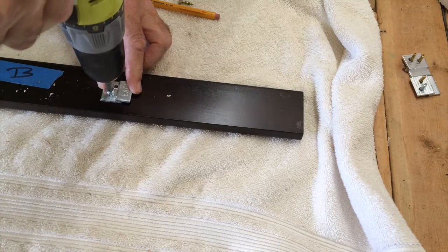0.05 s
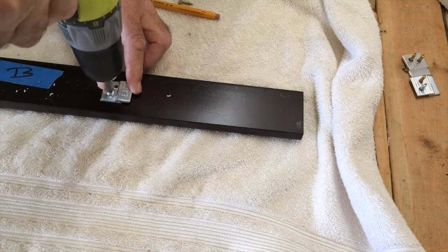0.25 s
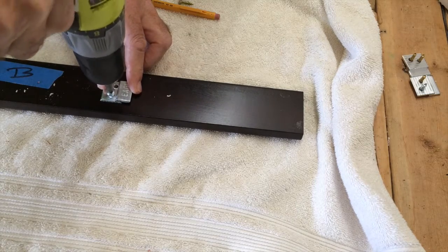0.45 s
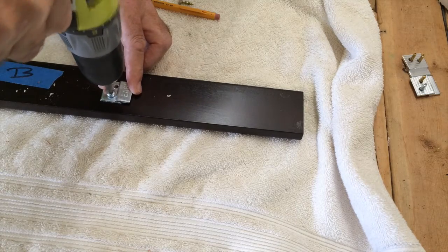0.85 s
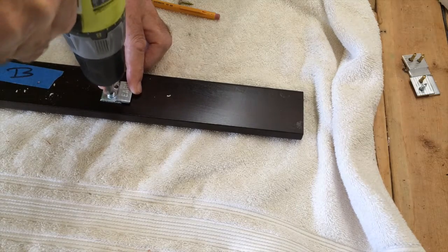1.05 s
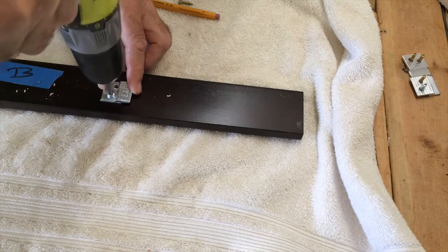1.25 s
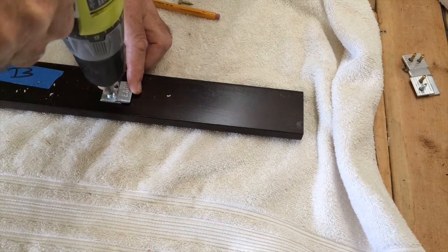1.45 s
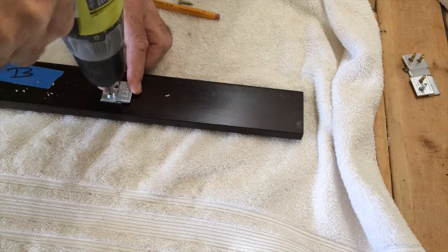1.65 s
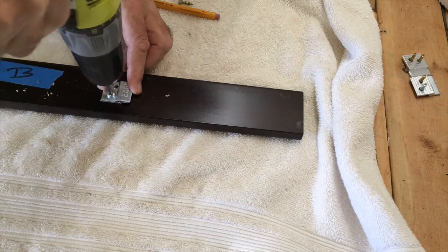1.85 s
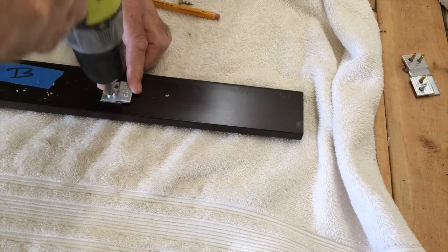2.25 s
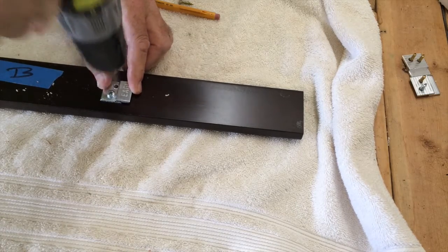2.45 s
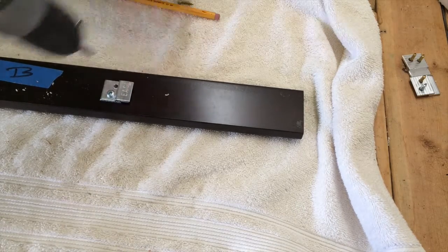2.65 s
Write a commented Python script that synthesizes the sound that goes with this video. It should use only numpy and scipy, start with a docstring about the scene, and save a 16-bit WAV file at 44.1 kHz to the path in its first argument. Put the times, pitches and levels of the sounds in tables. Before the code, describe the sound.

Close to the microphone in a small room, a cordless drill whines and whirrs in quick pulls, with soft board thuds and thin bit squeaks between them. Then it strains against the tight screw and its clutch slips with sharp clacks.

```python
"""A small room, one microphone close to a board that lies on a towel.
A cordless drill drives a screw through a metal hinge into the board. In each short pull the speed
control whines and the gears whirr; as it stops the board thuds and the steel bit squeaks.
Then the screw is tight and the clutch slips in hard clacks; one last pull, and the bit is lifted off."""
import sys
import numpy as np
from scipy import signal
from scipy.fft import rfft, irfft
from scipy.io import wavfile

SR = 44100
rng = np.random.default_rng(int(sys.argv[2]) if len(sys.argv) > 2 else 0)


def output_pcm(signal):
    """Save a mono or channel-first signal as 16-bit PCM at the path in sys.argv[1].

    Samples are clipped to [-1, 1] before scaling.
    """
    pcm = np.clip(np.atleast_2d(signal).T, -1, 1) * 32767
    wavfile.write(sys.argv[1], SR, np.round(pcm).astype(np.int16))


N = 119070
T = np.arange(N) / SR

# free-running trigger pulls: pressed t/s, released t/s, full-speed whine f/Hz, whine level/dB,
# gear level/dB, mesh level/dB relative to the gears
PULLS = [(-.15,-0.011,6300,-32,-28,-12), (0.196,0.366,6480,-38.5,-25.5,-7.5),
         (0.572,0.69,6306,-36,-24.5,-6), (0.91,1.026,6400,-40,-26.5,-11.5),
         (1.222,1.335,6376,-40.5,-29,-12.5)]
# spectrum of a light contact: f/Hz, level/dB
CONTACT_COLOUR = [(100,-3.5), (700,0), (1500,4), (2500,1.5), (4000,-2.5), (7000,-9), (15000,-24)]
SLACK_S, COAST_S = .012, .057  # the gears engage after the press and run on after the release


def amp(db):
    """Decibels to gain."""
    return 10 ** (np.asarray(db) / 20)


def unit(x):
    """Scale to rms 1."""
    return x / np.sqrt(np.mean(x ** 2) + 1e-20)


def drift(hz):
    """Random wander of rms 1, mostly slower than hz."""
    return unit(signal.sosfilt(signal.butter(2, hz, fs=SR, output="sos"), rng.standard_normal(N)))


def since(s):
    """Time gone by since s."""
    return np.maximum(T - s, 0)


def dying(t, t60):
    """Decay of 60 dB in t60."""
    return np.exp(-np.log(1000) * t / t60)


def gate(start, end, edge=.003):
    """On between two times, with soft edges."""
    return np.clip(np.minimum(T - start, end - T) / edge + .5, 0, 1)


def level(rows):
    """Gain along a curve of (t/s, level/dB), silent outside it."""
    s, db = np.transpose(rows)
    return amp(np.interp(T, s, db)) * gate(s[0], s[-1], edge=.004)


def colour(x, points, size=2048):
    """Minimum-phase filter through (f/Hz, level/dB) points; white noise keeps its level."""
    hz, db = np.transpose(points)
    bin_hz = np.arange(size + 1) * SR / size / 2
    gain = unit(amp(np.interp(np.log(bin_hz + 1), np.log(hz), db)))
    cepstrum = irfft(np.log(gain))
    cepstrum[1:size] *= 2
    cepstrum[size + 1:] = 0
    response = irfft(np.exp(rfft(cepstrum)))[:size]
    return signal.fftconvolve(x, response)[:N]


def clicks(rows):
    """One impulse per (t/s, level/dB)."""
    out = np.zeros(N)
    for s, db in rows:
        out[int(s * SR)] += amp(db)
    return out


def ring(x, modes):
    """Decaying sines, set off by x."""
    out = 0
    for hz, db, t60 in modes:
        r, w = amp(-60 / (t60 * SR)), 2 * np.pi * hz / SR
        out = out + amp(db) * signal.lfilter([0, np.sin(w)], [1, -2 * r * np.cos(w), r * r], x + 1e-18)
    return out


def cracks(rows, spectrum, t60):
    """Each contact is a brief, dying burst of noise."""
    envelope = signal.lfilter([1], [1, -dying(1 / SR, t60)], clicks(rows) + 1e-18)
    return colour(envelope * rng.standard_normal(N), spectrum)


def tone(hz):
    """Sine of rms 1 on a moving pitch."""
    return np.sqrt(2) * np.sin(2 * np.pi * np.cumsum(hz) / SR)


def whine(hz, start):
    """A tone whose octave fades after the start."""
    return tone(hz) + amp(-11.5) * np.exp(-since(start) / .036) * tone(2 * hz)


def speed_control():
    """The switched motor current sings; load pulls its pitch down, and it fades on release."""
    # whine against the tight screw, one curve a pull: t/s, f/Hz, level/dB
    strained_whines = [
        [(1.551,6200,-53), (1.555,5850,-44.5), (1.572,6500,-42.5), (1.59,6180,-50), (1.617,6150,-39.5),
         (1.645,6350,-44.5), (1.68,6390,-42), (1.698,5700,-40)],
        [(2.147,6280,-39.5), (2.151,5880,-43), (2.172,6430,-57), (2.205,5980,-35.5), (2.25,6150,-43.5),
         (2.277,6200,-43), (2.292,5700,-45)],
    ]
    # trigger just touched, motor still standing: start t/s, end t/s, level/dB
    touches = [(2.079,2.148,-66)]
    out, jitter_hz = np.zeros(N), 25 * drift(220)
    for curve in strained_whines:
        s, hz, db = np.transpose(curve)
        pitch = np.interp(T, s, hz) + jitter_hz
        out += gate(s[0], s[-1]) * amp(np.interp(T, s, db)) * whine(pitch, s[0])
    for pressed, released, top_hz, db, _, _ in PULLS:
        load_sag_hz = 480 * np.exp(-since(pressed) / .1)
        bite_sag_hz = 229 * np.exp(-((T - pressed - SLACK_S) / .01) ** 2)
        release_sag_hz = 496 * np.clip(since(released) / .0146, 0, 1)
        pitch = top_hz - load_sag_hz - bite_sag_hz - release_sag_hz + jitter_hz
        soft_start_db = -7.5 * np.exp(-since(pressed) / .008)
        current = amp(db + soft_start_db + 3 * drift(99)) * dying(since(released), t60=.09)
        out += current * gate(pressed, released + COAST_S) * whine(pitch, pressed)
    idle_hz = 6900 + .5 * jitter_hz
    touched = sum(amp(db) * gate(start, end) for start, end, db in touches)
    return out + touched * (amp(-4) * tone(idle_hz) + tone(2 * idle_hz))


def whirr_level(pressed, released, db):
    """The gears take up their slack, swell with speed and brake."""
    engaged = gate(pressed + SLACK_S, released + COAST_S, edge=.0082)
    swell = amp(db - 16.5 * np.exp(-since(pressed) / .058))
    braking = 1 - np.clip(since(released) / COAST_S, 0, 1) ** 2
    return engaged * swell * braking ** 2


def gears(impacts_per_s=9000, treble_hz=6480):
    """Dense tooth impacts ring in the gearbox, brighter with effort, and shake the board."""
    # gears labouring against the tight screw, one curve a pull: t/s, level/dB
    strains = [
        [(1.553,-40), (1.58,-39), (1.61,-35.5), (1.69,-40.5), (1.77,-43.5), (1.83,-60.5), (1.85,-80)],
        [(2.148,-42.5), (2.185,-36), (2.22,-44.5), (2.285,-32.5), (2.325,-38), (2.4,-56.5)],
    ]
    # spectrum of the tooth impacts: f/Hz, level/dB
    tooth_colour = [(100,-13), (260,-3), (450,-10), (620,-11.5), (1300,-7.5), (1800,-10), (2360,-8.5),
                    (3400,-4.5), (5600,-9), (7000,-11), (15000,-9)]
    # gearbox resonances: f/Hz, width/Hz, level/dB
    resonances = [(1040,76,-4.5), (1476,110,5.5), (1786,110,8), (4330,67,-9.5)]
    # spectrum of the shaken board: f/Hz, level/dB
    rumble_colour = [(25,-36), (110,9.5), (220,-7), (1500,-40)]
    effort = sum(whirr_level(pressed, released, db) for pressed, released, _, _, db, _ in PULLS)
    effort += sum(level(curve) for curve in strains)
    impacts = (rng.random(N) < impacts_per_s / SR) * rng.choice([-1, 1], N)
    teeth = unit(impacts * amp(3.5 * rng.standard_normal(N)))
    gearbox = sum(amp(db) * signal.lfilter(*signal.iirpeak(hz, hz / width, fs=SR), teeth)
                  for hz, width, db in resonances)
    grain = amp(drift(252))
    whirr = (colour(teeth, tooth_colour) + amp(-12) * unit(gearbox)) * grain
    dull = signal.lfilter(*signal.butter(2, treble_hz, fs=SR), whirr)
    treble = signal.lfilter(*signal.butter(1, treble_hz, "high", fs=SR), whirr)
    brightness = np.clip(effort / amp(-12), 0, 1)
    shaking = amp(-42.5) * (effort / effort.max()) ** .081  # nearly level while the gears work
    rumble = shaking * colour(rng.standard_normal(N), rumble_colour)
    return effort * (dull - brightness * treble) + rumble


def motor_speed(pressed, released, spin_up_s=.032, stop_s=.125):
    """Share of full speed: the motor spins up, then brakes to a stop."""
    spin_up = 1 - np.exp(-since(pressed) / spin_up_s)
    return spin_up * (1 - np.clip(since(released) / stop_s, 0, 1) ** 2)


def gear_mesh(top_mesh_hz=3076, top_growl_hz=231.8, pinion_teeth=12):
    """Mesh tones, the rasp of uneven teeth and the shaft's growl all rise and fall with speed."""
    # tones of the meshing teeth: multiple of the mesh frequency, level/dB
    orders = [(1/3,-13), (1/2,-12), (7/12,-8), (1,0), (13/12,-11), (1.3,-9), (1.5,-10)]
    rasp_harmonics = range(3, 25)
    out, waver = np.zeros(N), 1 + .0031 * drift(120)
    for pressed, released, _, _, gear_db, mesh_db in PULLS:
        speed = motor_speed(pressed, released)
        mesh_hz, growl_hz = top_mesh_hz * speed * waver, top_growl_hz * speed * waver
        mesh = speed ** 4 * sum(amp(db) * tone(k * mesh_hz) for k, db in orders)
        shaft_angle = 2 * np.pi * np.cumsum(mesh_hz / pinion_teeth) / SR
        rasp = sum(rng.rayleigh() * np.sin(k * shaft_angle + 2 * np.pi * rng.random())
                   for k in rasp_harmonics) / np.sqrt(len(rasp_harmonics))
        out += whirr_level(pressed, released, gear_db) * (amp(mesh_db) * mesh + amp(-13) * rasp)
        growl = tone(growl_hz) + amp(-5) * speed ** 2 * tone(2 * growl_hz)
        out += amp(-48.5 + 3 * drift(66)) * speed * growl
    return out


def hand():
    """The hand rubs on drill and board in many tiny contacts."""
    # strength of the rubbing: t/s, level/dB
    rubbing = [(0,-48), (.45,-101), (.55,-56), (.76,-90), (.88,-56.5), (1.48,-65), (1.98,-83), (2.07,-62.5),
               (2.42,-59), (2.7,-71)]
    contacts = [(s, 0) for s in rng.uniform(0, T[-1], 700)]
    return level(rubbing) * cracks(contacts, CONTACT_COLOUR, t60=.011)


def room_tone():
    """Faint, steady noise, mostly deep bass."""
    # spectrum of the quiet room: f/Hz, level/dB
    quiet_colour = [(15, 2.5), (25, -4), (1000, -26.5), (2780, -33), (15000, -54)]
    return amp(-58) * colour(rng.standard_normal(N), quiet_colour)


def board(shove_s=.0059):
    """The drill's kicks set the padded board rocking; the hard ones also make it rattle."""
    # shoves on the board: t/s, level/dB
    shoves = [(0.068,-35), (0.4425,-26), (.7655,-24), (1.094,-22), (1.244,-25.5), (1.357,-26),
              (1.388,-25.5), (1.586,-14.5), (1.654,-13), (1.7014,-13), (1.754,-20.5), (2.188,-23),
              (2.299,-15)]
    # modes of the board on its towel: f/Hz, level/dB, T60/s
    modes = [(108.8,-0.5,0.096), (177,-14,.1), (281,-20,0.16)]
    # spectrum of the rattle: f/Hz, level/dB
    rattle_colour = [(50,-29.5), (170,4.5), (260,-3.5), (450,-13), (2000,-40.5)]
    kick = np.diff(np.exp(-(np.pi * (T[:SR // 10] / shove_s - 1)) ** 2))  # a push, then a pull
    kick *= 2 / np.abs(kick).sum()
    centre = int(shove_s * SR)
    force = signal.fftconvolve(clicks(shoves), kick)[centre:centre + N]
    hardest_db = max(db for _, db in shoves)
    rattles = [(s, db + .98 * (db - hardest_db)) for s, db in shoves]
    return ring(force, modes) + amp(-7.5) * cracks(rattles, rattle_colour, t60=.18)


def bit_knocks():
    """The bit knocks in the screw head with light ticks."""
    # knocks: t/s, level/dB
    knocks = [(.2054,-32.5), (.488,-46.5), (.7926,-44), (.854,-51), (.925,-40), (1.2251,-39.5),
              (1.3877,-35.5), (2.1285,-41.5), (2.1745,-24), (2.353,-33.5), (2.485,-39.5)]
    return cracks(knocks, CONTACT_COLOUR, t60=.028)


def bit_squeaks(fall_hz_per_s=7600):
    """The bit slides in the screw head with thin, falling squeaks and a faint scratch."""
    # slides of steel on steel: loudest t/s, half length/s, f/Hz, level/dB
    slides = [(0.448,0.0089,15100,-48), (0.471,0.006,15130,-25.5), (0.786,0.0078,14950,-45.5),
              (0.822,0.0026,15270,-20), (1.094,0.0041,15200,-45), (1.135,0.0031,10480,-29.5),
              (1.137,0.0044,7350,-48), (1.148,0.012,15130,-45), (2.405,0.003,15430,-41.5),
              (2.448,0.0059,15400,-25)]
    # spectrum of the scratch: f/Hz, level/dB
    scratch_colour = [(800,-25.5), (3500,2.5), (6500,-10.5), (14000,1)]
    out, jitter_hz = np.zeros(N), 103 * drift(200)
    scratch = amp(-46) * colour(rng.standard_normal(N), scratch_colour)
    for s, half_s, hz, db in slides:
        swell = np.exp(-.5 * np.minimum(((T - s) / half_s) ** 2, 100))
        squeak = tone(hz + jitter_hz - fall_hz_per_s * (T - s))
        out += swell * (amp(db) * squeak + amp(.35 * db) * scratch)
    return out


def clutch():
    """The clutch balls ride over their ramps with a ringing clack, then snap shut brightly."""
    # balls riding over: t/s, level/dB
    clacks = [(1.583,-13), (1.5868,-19.5), (1.5915,-16), (1.651,-11.5), (1.6548,-13), (1.6965,-22.5),
              (1.7005,-22.5), (1.7095,-13), (1.751,-15), (2.301,-16)]
    # spectrum of a clack: f/Hz, level/dB
    clack_colour = [(100,3.5), (400,-6), (800,-11.5), (1300,12), (2100,-1.5), (4000,-5), (8000,-17.5),
                    (15000,-24.5)]
    # modes of the clutch: f/Hz, level/dB, T60/s
    modes = [(1300,-9,0.028), (1467,-7,0.042), (2013,-11,0.022), (2627,-18.5,0.043)]
    # clutch shutting: t/s, level/dB
    snaps = [(1.59,-14), (1.593,-20), (1.6652,-13), (1.7088,-16.5), (1.764,-19), (2.3058,-15), (2.313,-21)]
    # spectrum of a snap: f/Hz, level/dB
    snap_colour = [(100,-1.5), (400,-0.5), (800,1.5), (1500,6.5), (2500,1.5), (4200,-2.5), (7000,-5),
                   (10000,-9), (15000,-12)]
    clack = amp(-1.5) * cracks(clacks, clack_colour, t60=.017) + ring(clicks(clacks), modes)
    return clack + cracks(snaps, snap_colour, t60=.016)


def room(x, size=32768):
    """Quick reflections off the bench reach the microphone, then a faint tail, weak in the treble."""
    # bands of the tail: low f/Hz, high f/Hz, T60/s, level/dB
    tail_bands = [(68.4,680,0.25,-10.5), (424,2550,0.24,-12), (3100,12400,0.27,-28)]
    t = T[:size]
    early = rng.standard_normal(size) * dying(t, t60=.059) * (t > .002)
    response = amp(-14) * unit(early)
    for low, high, t60, db in tail_bands:
        bandpass = signal.butter(2, [low, high], "band", fs=SR, output="sos")
        band = signal.sosfilt(bandpass, rng.standard_normal(size))
        response += amp(db) * band * unit(dying(t, t60) * (t > .008))
    return signal.fftconvolve(x, response / np.sqrt(size))[:N]


def scene():
    """Drill, screw and board close to the microphone, over the quiet of the room."""
    work = hand() + speed_control() + gears() + gear_mesh()
    work += clutch() + board() + bit_squeaks() + bit_knocks()
    return (work + room(work) + room_tone())[None]


def record(dry):
    """The recorder cuts the top steeply above 15.6 kHz."""
    return signal.sosfilt(signal.ellip(10, .2, 70, 15600, fs=SR, output="sos"), dry)


dry = scene()
out = record(dry)
output_pcm(out)
```